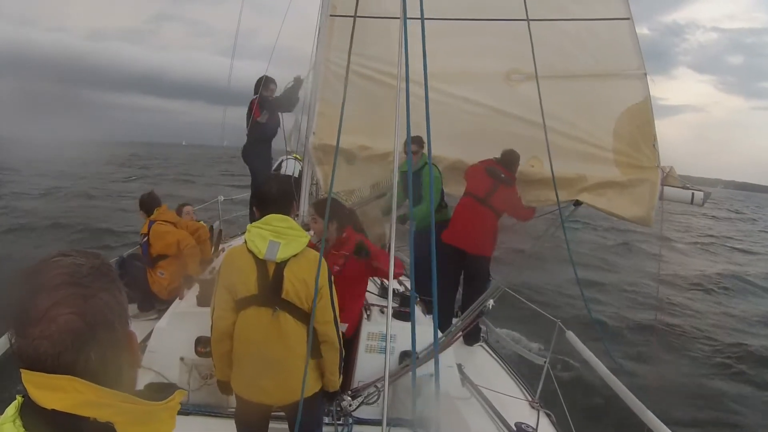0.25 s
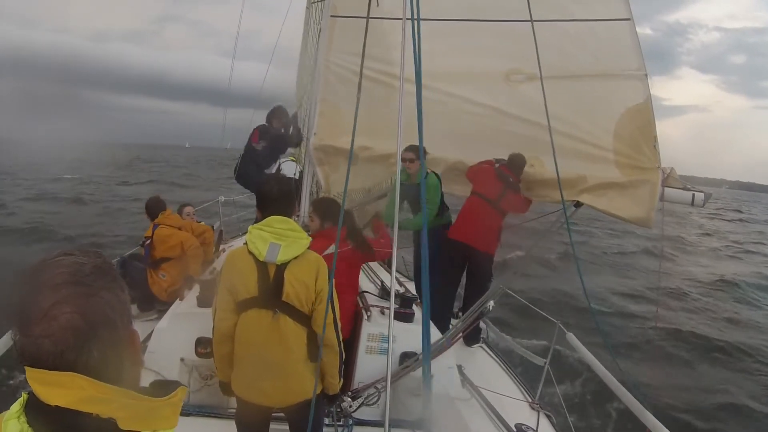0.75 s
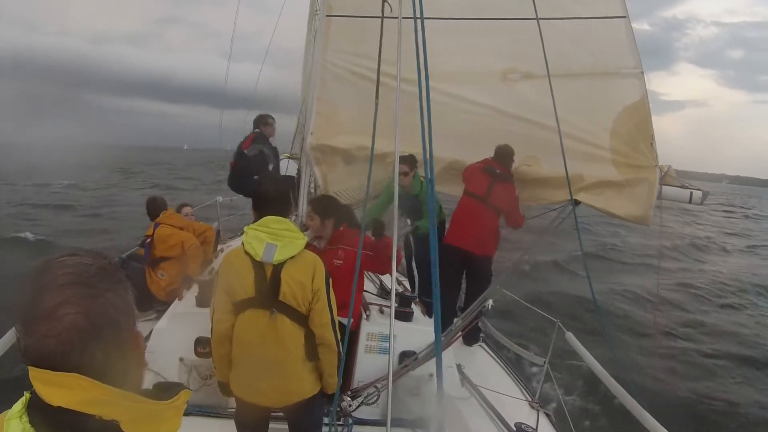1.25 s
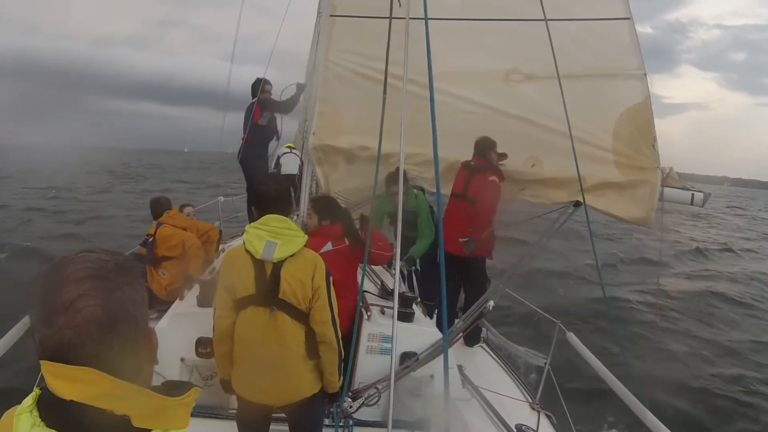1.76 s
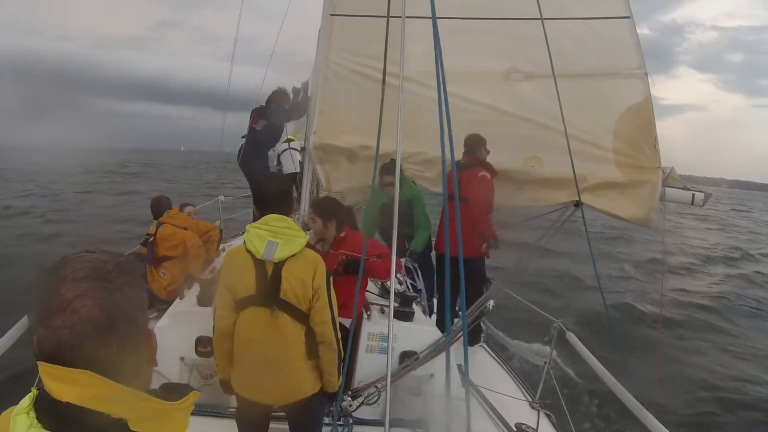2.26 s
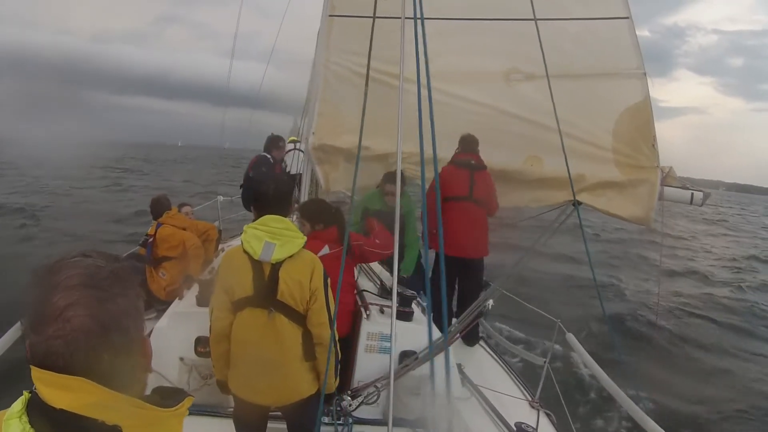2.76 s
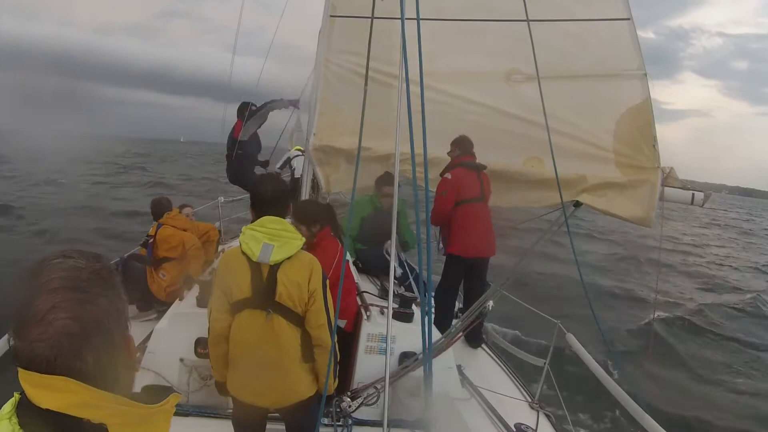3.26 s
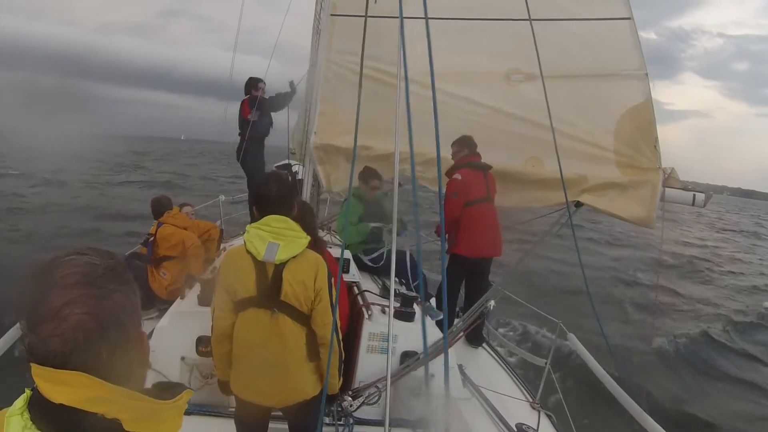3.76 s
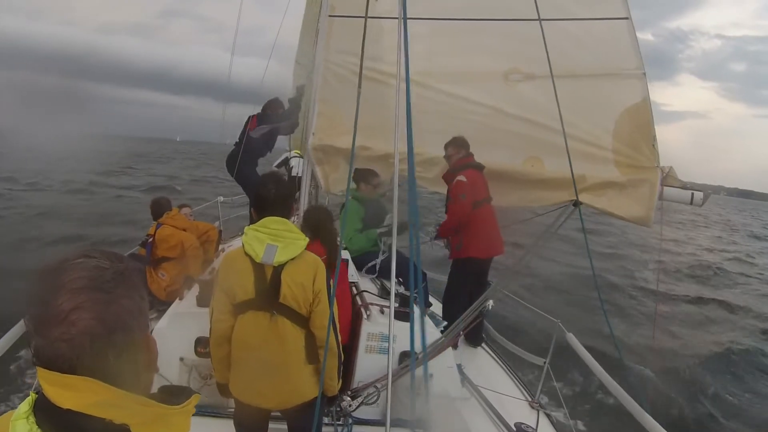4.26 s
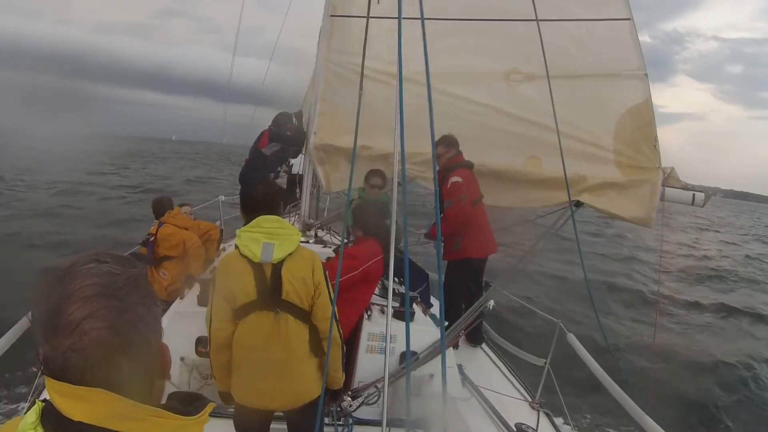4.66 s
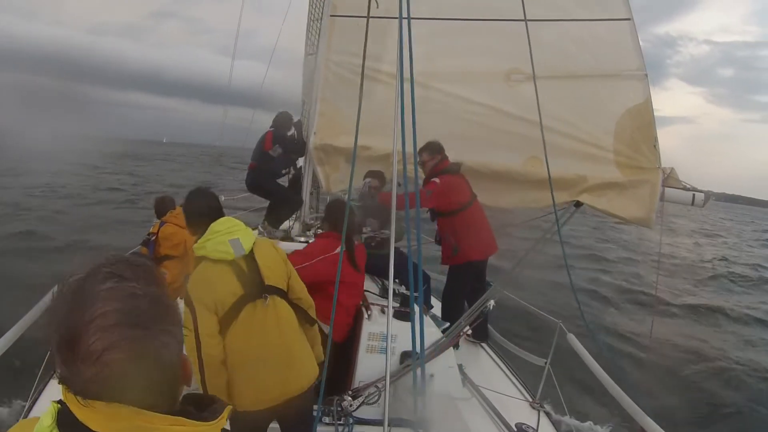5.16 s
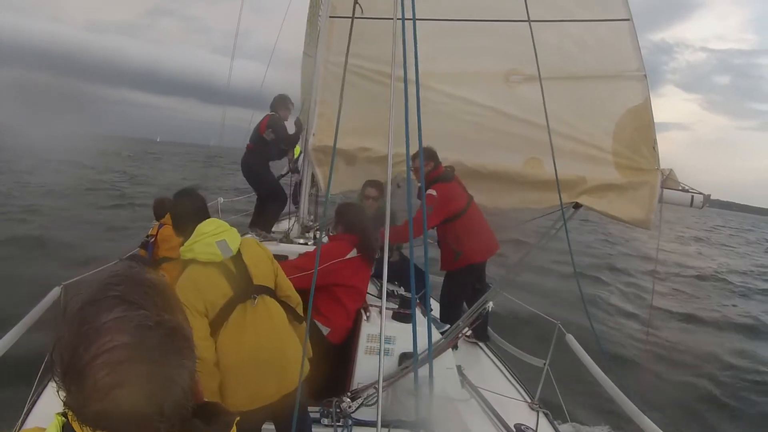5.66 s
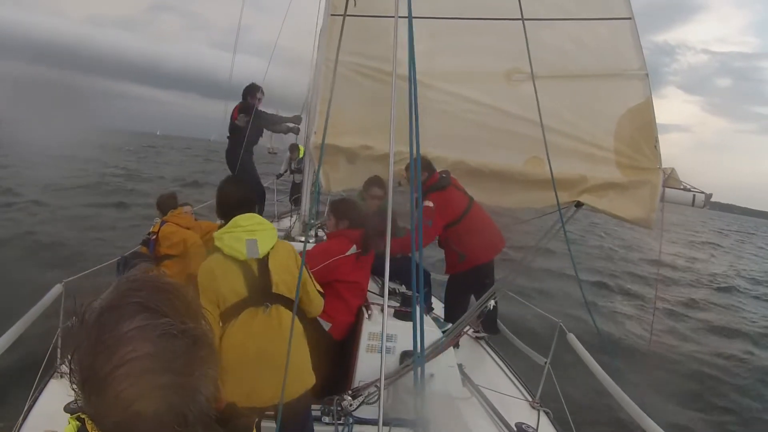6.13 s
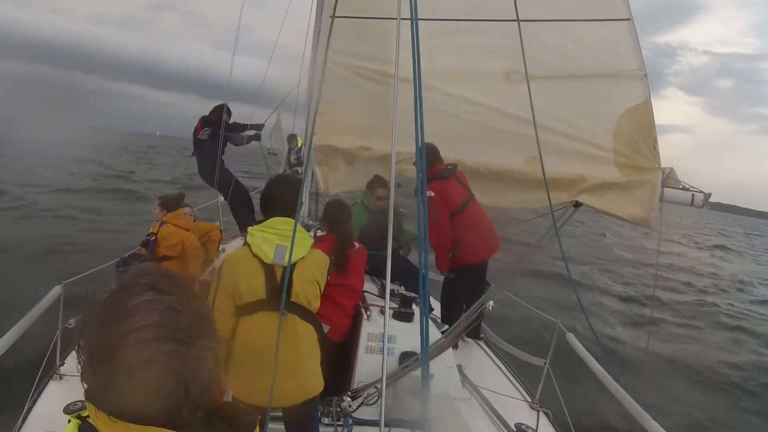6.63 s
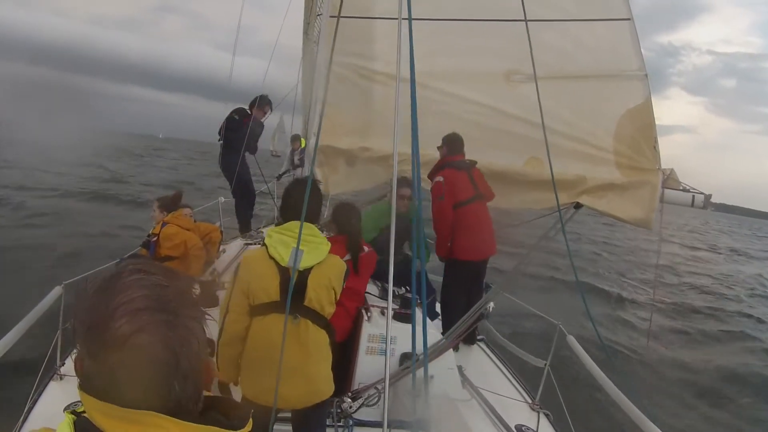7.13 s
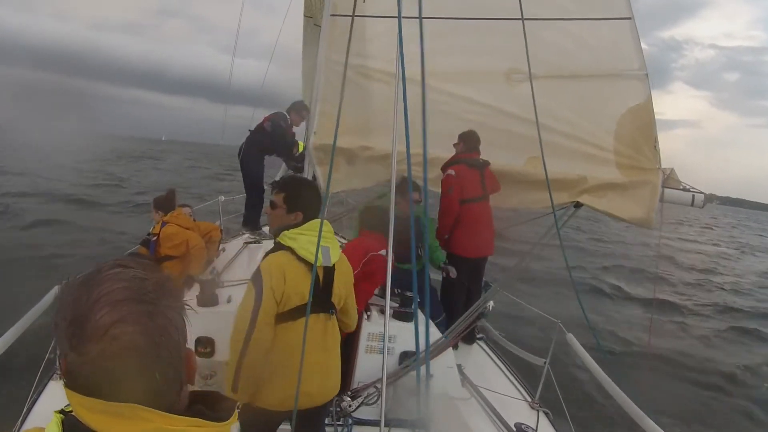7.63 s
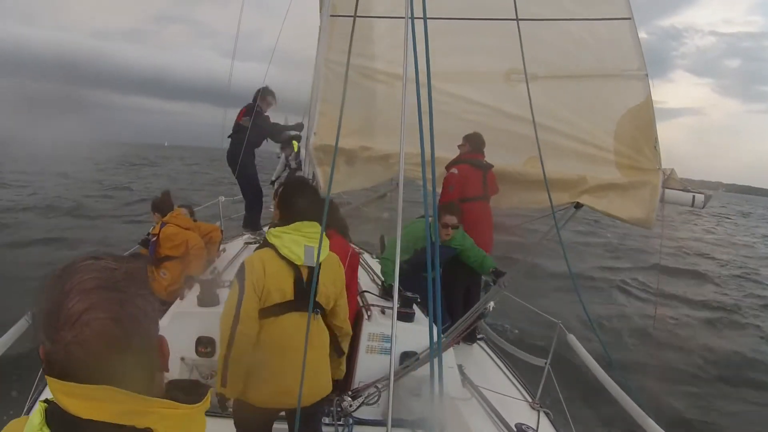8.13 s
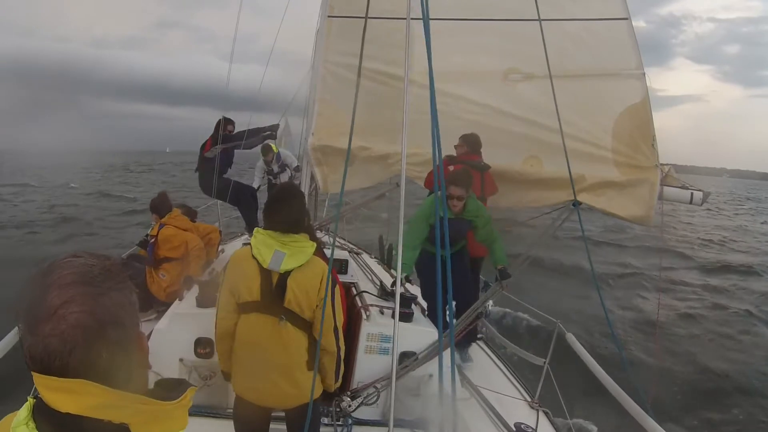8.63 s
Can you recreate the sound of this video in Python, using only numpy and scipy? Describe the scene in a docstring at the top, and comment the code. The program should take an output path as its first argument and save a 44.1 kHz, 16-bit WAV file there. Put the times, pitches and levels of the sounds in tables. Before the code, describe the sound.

Close up on a sailing yacht, a winch is cranked in six quick, overlapping strokes, its pawls chattering brightly over a growling deck. Low gusts thump the rail-mounted microphone, and a heavy knock lands among them. After three seconds the winch stops with a flurry of clacks and a creak; rope rubs, swishes, knocks and squeaky creaks follow over lapping water, with a brief, faint winch turn late on.

```python
"""Winch on a yacht's stern

Close on the winch: spun stroke by stroke, its pawls chatter into the ringing drum and its bearings growl in the deck.
Gusts buffet the microphone and boom in its mount; deck gear knocks the rail that carries it and loaded lines creak.
Nearby, rope and cloth rub and swish, loose rigging taps and waves thud on the hull; water laps and hisses further off.
Blows of noise ring resonances, shaped noise makes wind, rope and sea, and unsteady sines with rasp make creaks.
"""
import sys
import numpy as np
from scipy import signal
from scipy.fft import rfft, irfft
from scipy.io import wavfile
from scipy.ndimage import uniform_filter1d, map_coordinates

SR = 44100
rng = np.random.default_rng(int(sys.argv[2]) if len(sys.argv) > 2 else 0)


def inscribe(sig):
    """Save sig as 16-bit PCM at rate SR to the path in sys.argv[1].

    A 1-D sig is mono; a 2-D sig holds one channel per row.
    Samples are clipped to [-1, 1] before scaling.
    """
    pcm = np.round(np.clip(np.atleast_2d(sig).T, -1, 1) * 32767)
    wavfile.write(sys.argv[1], SR, pcm.astype(np.int16))


N = 392049
TIME = np.arange(N) / SR  # seconds

# winch strokes: start_s, end_s, chatter_db (pawls), growl_db (bearings)
WINCH_STROKES = [(-.04, 0.498, -36, -35.5), (0.476, 0.978, -33.5, -33), (0.852, 1.382, -36, -35),
                 (1.344, 1.882, -38, -35.5), (1.878, 2.409, -41.5, -40), (2.351, 2.879, -38.5, -36.5),
                 (4.14, 4.774, -49.5, -44), (7.168, 7.477, -45, -39.5)]
# single pawl clacks, during, between and just after strokes: start_s, peak_db (before the common trim)
SINGLE_PAWLS = [(1.375, -33.5), (1.798, -31), (1.88, -35.5), (2.887, -36.5), (2.916, -44), (2.927, -36),
                (2.9468, -32.5), (2.958, -32.5), (2.972, -34), (2.9875, -33), (3.4376, -45), (4.152, -44),
                (4.1974, -55), (7.4037, -51), (7.4784, -36.5)]
# resonances of the winch drum: pitch_hz, half_width_hz, level_db (relative)
DRUM_MODES = [(2651, 20, -5), (3410, 240, -27), (4164, 103, -10), (4300, 44, -1), (4910, 280, -17),
              (5530, 28.3, -5), (5715, 96, -18), (6780, 32, -20.5), (6870, 22, -22.5), (8320, 140, -33),
              (10400, 380, -39.5), (12150, 130, -39.5)]
# resonances of the deck under the winch: pitch_hz, half_width_hz, level_db (relative)
DECK_MODES = [(292, 55, -4.5), (713, 72, -7.5), (972, 28.5, 2.5), (1158, 127, -8.5), (1393, 257, -13.5),
              (2045, 23, -14.5), (2365, 136, -17.5), (2726, 140, -16.5), (2920, 54, -15.5)]
# spectrum of a pawl's bare snap: frequency_hz, level_db (relative)
SNAP_SPECTRUM = [(300, -45), (3000, -76.5), (6300, -37), (7400, -36), (9300, -42.5), (14500, -55)]

# gusts striking the microphone: start_s, hold_s, boom_db, shudder_db (before the wind trims)
WIND_GUSTS = [(0.316, 0.089, -31, -61), (0.779, 0.011, -16.5, -33.5), (0.866, 0.0095, -12.5, -28),
              (0.971, 0.021, -12.5, -32.5), (1.16, 0.046, -17.5, -33), (1.286, 0.06, -24, -52),
              (1.576, 0.13, -21.5, -30), (1.814, 0.047, -11, -29), (2.02, 0.019, -25.5, -59),
              (2.274, 0.12, -25, -52), (2.384, 0.28, -30, -31.5), (2.602, 0.23, -23, -44),
              (3.77, 0.25, -32.5, -53.5), (4.424, 0.12, -16, -30.5), (4.742, 0.038, -26.5, -31.5),
              (4.826, 0.06, -17, -52), (4.981, 0.061, -21.5, -42), (5.826, 0.11, -42, -44),
              (5.968, 0.042, -23, -57), (6.278, 0.19, -31.5, -46), (6.522, 0.17, -26.5, -44.5),
              (6.916, 0.047, -35, -76), (7.17, 0.27, -33, -45.5), (7.657, 0.47, -36, -78),
              (8.442, 0.089, -29.5, -46.5), (8.683, 0.1, -38.5, -51)]
GUST_ATTACK_S, GUST_RELEASE_S, PUFF_RELEASE_S = 0.032, 0.076, 0.022
# steady breeze between the gusts: time_s, boom_db, shudder_db (before the wind trims)
BREEZE_LEVELS = [(0, -40.5, -52), (.65, -37.5, -43.5), (1.1, -28.5, -36), (3.2, -33, -38), (3.62, -39, -53),
                 (4.3, -35, -53), (5.3, -38, -57), (5.55, -43, -57.5), (5.702, -35.5, -49),
                 (7.1, -38.5, -58), (8.3, -45, -91), (8.89, -42, -70)]
# spectrum of the boom in the mount: frequency_hz, level_db (relative)
BOOM_SPECTRUM = [(20, -37.5), (42, -11), (66, -30.5), (84, 11.5), (98, -1.5), (125, -5.5), (150, -14),
                 (190, -83)]
# spectrum of the mount's shudder: frequency_hz, level_db (relative)
SHUDDER_SPECTRUM = [(170, -25), (260, -6.5), (294, 2.5), (318, -11.5), (341, 0.5), (385, -19.5),
                    (450, -15.5), (540, -35), (680, -16.5), (830, -35.5), (1000, -21), (1400, -24),
                    (1900, -37)]

# knocks of deck gear: start_s, boom_db, body_db, clack_db (peaks), scrape_s (decay)
GEAR_KNOCKS = [(1.156, -30, -21, -35, 0.012), (1.696, -37, -20, -31, 0.004), (1.776, -5, -14, -21.5, 0.019),
               (1.923, -42, -18, -41, 0.011), (2.856, -46, -33, -32, 0.00077),
               (3.097, -48, -43, -40, 0.0027), (3.368, -42, -29.5, -43, 0.0086),
               (4.44, -19.5, -27, -25.5, 0.018), (4.503, -27, -37, -39, 0.0017),
               (4.602, -41, -40, -33.5, 0.0026), (5.561, -66, -64, -42.5, 0.0013),
               (6.168, -60, -40.5, -37.5, 0.0017), (7.285, -44, -35, -30.5, 0.02),
               (7.785, -28.5, -30, -27, 0.0078), (7.854, -30.5, -43, -35, 0.01),
               (7.901, -41, -34.5, -66, 0.0044), (8.123, -32, -48, -44, 0.0027)]
# resonances of the rail that carries the microphone: pitch_hz, t60_s, level_db (relative)
RAIL_MODES = [(97, 0.22, -2), (121.6, 0.053, 10.5), (293.5, 0.1, 15), (339.6, 0.18, 1), (414, 0.11, 1.5),
              (757, 0.039, -10), (1025, 0.07, 11.5), (1190, 0.051, 15), (1325, 0.082, 11.5),
              (1455, 0.042, -2.5), (1980, 0.033, -2), (2940, 0.039, -3), (3600, 0.052, -6.5)]
# spectrum of a knock's dry crack, also used for the taps: frequency_hz, level_db (relative)
CRACK_SPECTRUM = [(200, -5), (500, -5), (800, -2), (1050, 17), (1520, 13), (1850, -7), (2100, 2),
                  (2900, -18.5), (3900, -21), (4500, -39)]

# lines slipping under load, and one short metallic clink (2.851 s): start_s, length_s, pitch_hz (centre),
# level_db
LINE_CREAKS = [(2.298, 0.055, 627, -45.5), (2.851, 0.043, 1395, -46), (2.972, 0.11, 334, -26),
               (3.065, 0.11, 333.8, -29.5), (3.155, 0.042, 314, -36), (3.198, 0.078, 291.7, -29),
               (3.259, 0.1, 292, -43.5), (4.26, 0.032, 674, -43.5), (4.44, 0.072, 292.7, -19.5),
               (4.461, 0.12, 1010, -36), (4.637, 0.066, 1077, -43.5), (4.691, 0.067, 1037, -40.5),
               (4.758, 0.04, 1025, -40.5), (4.833, 0.059, 987, -33), (6.468, 0.045, 992, -36),
               (6.488, 0.037, 1193, -33.5), (6.513, 0.069, 966, -38.5), (6.495, 0.035, 1730, -48.5),
               (6.591, 0.094, 995, -33.5), (6.696, 0.05, 663, -36.5), (6.705, 0.05, 1390, -48),
               (6.74, 0.036, 1960, -52.5), (6.741, 0.1, 696, -46), (8.469, 0.084, 297, -42),
               (8.602, 0.08, 904, -57), (8.68, 0.053, 318, -44.5)]

# pulls of rope over the deck, with cloth rubbing: start_s, length_s, level_db (before the rub trim)
ROPE_PULLS = [(2.776, 1.08, -54), (3.87, 0.4, -48), (4.194, 1.1, -57.5), (4.685, 0.56, -58.5),
              (5.215, 1.4, -57.5), (6.265, 0.97, -52)]
PULL_SWELL = 0.75  # power of the sine arch of a pull
# spectrum of rope and cloth rubbing: frequency_hz, level_db (relative)
RUB_SPECTRUM = [(400, -1), (700, 9.5), (1200, 7), (1850, 4.5), (2600, 8.5), (3600, -6.5), (5200, 0.5),
                (14500, -37)]
# quick swishes and ticks of rope and cloth: start_s, level_db, decay_s
ROPE_SWISHES = [(3.22, -51.5, 0.027), (3.362, -69, .012), (3.957, -62, .07), (4.034, -50, 0.007),
                (4.783, -42.5, 0.034), (5.049, -43, 0.0075), (5.068, -44.5, 0.0062), (5.135, -54, 0.14),
                (6.336, -52, 0.035), (6.442, -52.5, 0.04), (6.81, -51, 0.11)]
# spectrum of the swishes: frequency_hz, level_db (relative)
SWISH_SPECTRUM = [(1500, -11), (2600, 14), (3600, 4), (5200, 12), (10000, -13), (13500, -8), (15000, -27)]
# rope and rigging tapping: TAP_DB is the faintest, TAP_SPREAD_DB the range above it
TAPS_PER_S, TAP_DB, TAP_SPREAD_DB, TAP_DECAY_S = 3, -63.5, 10.5, 0.0063

# waves thudding on the hull: start_s, level_db (before the swing's rise and decay)
HULL_THUDS = [(7.872, -28), (8.081, -21)]
# spectrum of the sea with the low rumble of steady wind: frequency_hz, level_db (relative, per Hz)
SEA_SPECTRUM = [(20, 23), (41, 22), (60, 20.5), (190, 7.5), (300, 11), (540, -11.5), (690, 4), (830, -6.5),
                (1000, 2.5), (1850, -8), (2600, -4.5), (3600, -14.5), (5100, -10.5), (7000, -21),
                (14000, -26.5)]
EDGE_HZ = 14700  # upper edge of the recorder's band


def amp(db):
    """Decibels to gain."""
    return 10 ** (np.asarray(db) / 20)


def unit(x):
    """Scales to an rms of one."""
    return x / np.sqrt(np.mean(x ** 2) + 1e-20)


def shape(points, hz):
    """Gain of a spectrum, joined on a log-frequency axis; above its last point it falls away steeply."""
    f, db = np.transpose(points)
    return amp(np.interp(np.log(hz + 1), np.log(f), db)) / np.maximum(hz / f[-1], 1) ** 4


def noise(points):
    """Noise with the given spectrum, at an rms of one."""
    spectrum = rfft(rng.standard_normal(N))
    return unit(irfft(spectrum * shape(points, np.fft.rfftfreq(N, 1 / SR)), N))


def wander(hz):
    """Slow chance, up to about hz changes a second, at an rms of one."""
    spectrum = rfft(rng.standard_normal(N))
    return unit(irfft(spectrum / (1 + (np.fft.rfftfreq(N, 1 / SR) / hz) ** 4), N))


def steadied(x, seconds):
    """Takes the slow swells out of a noise and keeps its quick flutter."""
    size = max(int(seconds * SR), 8)
    power = uniform_filter1d(uniform_filter1d(x ** 2, size), size)
    return x / np.sqrt(power + 1e-4)


def add(mix, s, sound):
    """Mixes a sound in at time s, in seconds."""
    part = mix[max(round(s * SR), 0):][:len(sound)]
    part += sound[:len(part)]


def ring(modes, snap_db, size=8192):
    """The causal (minimum-phase) ring of a set of resonances and the bare snap after one click."""
    hz = abs(np.fft.fftfreq(size, 1 / SR))
    power = (amp(snap_db) * shape(SNAP_SPECTRUM, hz)) ** 2
    for f, width, db in modes:
        power = power + (amp(db) / (1 + ((hz - f) / width) ** 2)) ** 2
    log_gain = np.log(power) / 2
    return np.fft.ifft(np.exp(np.conj(signal.hilbert(log_gain)))).real[:size // 2]


def winch(teeth_per_s=75, bounce_s=0.024, uneven_db=3, swell=1.9, coast=0.23):
    """Each stroke speeds the drum up and lets it coast; pawls drop faster with it and bounce, bearings rattle."""
    start, end, chatter_db, growl_db = np.transpose(WINCH_STROKES)[:, :, None]
    arch = np.sin(np.pi * np.clip((TIME - start) / (end - start), 0, 1)).clip(0)
    force = (1 - coast) * arch ** swell + coast * np.tanh(20 * arch)
    speed = np.sqrt(arch.max(0)) * amp(3 * wander(60))
    teeth = np.cumsum(teeth_per_s * speed) / SR
    drops = np.diff(np.floor(teeth), prepend=0) * amp(uneven_db * rng.standard_normal(N))
    # every drop ends in a burst of tiny bounces
    contact = unit(signal.lfilter([1], [1, -np.exp(-1 / (bounce_s * SR))], drops))
    spots = drum_spots()
    chatter = struck_metal(contact, teeth, spots, waver_s=0.00003)
    growl = struck_metal(contact, teeth, [ring(DECK_MODES, snap_db=0.0)], waver_s=0.000398)
    chatter_level = np.linalg.norm(amp(chatter_db) * force, axis=0)  # overlapping strokes add in power
    growl_level = np.linalg.norm(amp(growl_db) * force, axis=0)
    return chatter_level * chatter + growl_level * growl + single_pawls(spots)


def struck_metal(contact, teeth, rings, waver_s):
    """Noisy blows ring the body, each drop on a spot drawn at random; the ring wavers slightly in pitch."""
    blows = contact * rng.standard_normal(N)
    struck = rng.integers(0, len(rings), N)[teeth.astype(int)]
    sound = sum(signal.oaconvolve(blows * (struck == k), body)[:N] for k, body in enumerate(rings))
    read_at = (TIME + waver_s * wander(9.4)) * SR
    sound = map_coordinates(sound, [read_at], mode="reflect")
    return steadied(unit(sound), 0.056)


def single_pawls(spots, pawl_db=-1, settle_s=0.0019):
    """A single pawl slides off its tooth and settles in bounces, ringing one spot of the drum."""
    out, t = np.zeros(N), TIME[:SR // 20] / settle_s
    for s, db in SINGLE_PAWLS:
        bounces = rng.standard_normal(len(t)) * t * np.exp(-t)
        drop = signal.fftconvolve(bounces, spots[rng.integers(len(spots))])
        add(out, s, amp(db + pawl_db) * drop / abs(drop).max())
    return out


def drum_spots(colour_db=1.5, detune_hz=18, snap_db=-5.5, count=5):
    """The drum's ring at several spots around it: each shifts the strength and pitch of the modes a little."""
    steps = np.tile(np.linspace(-1, 1, count), (2, len(DRUM_MODES), 1))
    db, hz = rng.permuted(steps, axis=2)
    same_width = np.zeros(len(DRUM_MODES))
    spots = []
    for k in range(count):
        shift = np.transpose([detune_hz * hz[:, k], same_width, colour_db * db[:, k]])
        spots.append(ring(np.array(DRUM_MODES) + shift, snap_db))
    return spots


def wind(buffet_db=-0.5, shudder_db=-1, flutter_db=3.5):
    """Gusts ride on the breeze; their eddies boom in the microphone's mount and make it shudder."""
    times, *levels = np.transpose(BREEZE_LEVELS)
    power = np.array([amp(np.interp(TIME, times, db)) ** 2 for db in levels])
    for start, hold, *db in WIND_GUSTS:
        power += (amp(db)[:, None] * gust(start, hold)) ** 2
    push, shake = np.sqrt(power)
    boom = steadied(noise(BOOM_SPECTRUM), 0.045)
    shudder = unit(steadied(noise(SHUDDER_SPECTRUM), 0.034) * amp(flutter_db * wander(18)))
    return amp(buffet_db) * push * boom + amp(shudder_db) * shake * shudder


def gust(start, hold):
    """A gust builds quickly, holds and dies away, the sooner the shorter it is."""
    t = TIME - start
    release = min(PUFF_RELEASE_S + hold / 2, GUST_RELEASE_S)
    return np.clip(t / GUST_ATTACK_S, 0, 1) * np.exp(-np.maximum(t - GUST_ATTACK_S - hold, 0) / release)


def knocks(scrape=0.11, crack_db=-7, crack_s=0.008):
    """Each blow cracks and, with a short scrape after it, rings the low, middle and high modes of the rail."""
    out, t = np.zeros(N), np.arange(SR // 2) / SR
    register = np.digitize([mode[0] for mode in RAIL_MODES], [190, 560])  # Hz between low, middle and high
    rings = []
    for hz, t60, db in RAIL_MODES:
        # a mode swells over about its first cycle, so the low ones start softly
        onset = 1 - np.exp(-(2 * hz * t) ** 2)
        rings.append(amp(db - 60 * t / t60) * np.sin(2 * np.pi * hz * t) * onset)
    rings = np.array(rings)
    crack = noise(CRACK_SPECTRUM)
    for s, boom_db, body_db, clack_db, scrape_s in GEAR_KNOCKS:
        blow = scrape * rng.standard_normal(len(t)) * np.exp(-t / scrape_s)
        blow[0] += 1
        for k, db in enumerate((boom_db, body_db, clack_db)):
            sound = signal.fftconvolve(blow, rings[register == k].sum(0))[:len(t)]
            add(out, s, amp(db) * sound / abs(sound).max())
        add(out, s, amp(clack_db + crack_db) * crack[int(s * SR):][:len(t)] * np.exp(-t / crack_s))
    return out


def creaks(jitter=0.025, sag=0.015, bend=0.07, rough_db=3.0, second_db=-26, third_db=-33, early=0.69,
           rasp_db=-15, rasp_at_hz=1000, rasp_top_hz=1600, tail_db=-15, tail_s=0.17):
    """A slipping line gives short, unsteady tones that swell, bend with the load, rasp on the deck and linger."""
    out, waver, grip = np.zeros(N), wander(100), wander(65)
    rasp = signal.oaconvolve(rng.standard_normal(N), ring(DECK_MODES, snap_db=-23))[:N]
    rasp = amp(rasp_db) * unit(rasp)
    rasp = signal.sosfilt(signal.butter(2, rasp_top_hz, fs=SR, output="sos"), rasp)
    for s, length, hz, db in LINE_CREAKS:
        count = int(length * SR)
        at = slice(int(s * SR), int(s * SR) + count)
        load = np.sin(np.pi * np.linspace(0, 1, count) ** early)  # peaks before the middle
        rise = bend * (load - np.average(load, weights=load ** 2))
        pitch = hz * (1 + rise + np.linspace(sag, -sag, count) + jitter * waver[at])
        turn = 2 * np.pi * np.cumsum(pitch) / SR
        tone = np.sin(turn) + amp(second_db) * np.sin(2 * turn) + amp(third_db) * np.sin(3 * turn)
        tone += rasp[at] * np.sqrt(hz / rasp_at_hz)  # higher creaks rasp more
        add(out, s, amp(db) * unit(load * tone * amp(rough_db * grip[at])))
    tail = rng.standard_normal(SR // 4) * np.exp(-TIME[:SR // 4] / tail_s)
    return out + amp(tail_db) * signal.oaconvolve(out, tail / np.linalg.norm(tail))[:N]


def ropes(grain_db=3, rub_db=-1):
    """Each pull of a rope swells and fades with a grainy rub; quick swishes of noise start sharply and decay."""
    speed = np.zeros(N)
    for s, length, db in ROPE_PULLS:
        arch = np.sin(np.pi * np.clip((TIME - s) / length, 0, 1)).clip(0)
        speed += amp(db) * arch ** PULL_SWELL
    out = amp(rub_db) * speed * unit(noise(RUB_SPECTRUM) * amp(grain_db * wander(130)))
    hiss = unit(noise(SWISH_SPECTRUM) * amp(1.0 * wander(300)))
    t = np.arange(SR // 3) / SR
    for s, db, decay in ROPE_SWISHES:
        add(out, s, amp(db) * hiss[int(s * SR):][:len(t)] * np.exp(-t / decay))
    return out


def taps():
    """Faint, dull scuffs of loose rigging: brief bursts of noise at random moments."""
    out, t = np.zeros(N), TIME[:SR // 10] / TAP_DECAY_S
    for when, size in rng.random((int(TAPS_PER_S * N / SR), 2)):
        add(out, when * N / SR, amp(TAP_DB + TAP_SPREAD_DB * size) * t * np.exp(1 - t))
    return out * noise(CRACK_SPECTRUM)


def hull(hull_hz=40, decay_s=0.097, rise_s=0.0047):
    """A wave sets the hull swinging for a few deep cycles."""
    out, t = np.zeros(N), np.arange(SR // 2) / SR
    swing = np.sin(2 * np.pi * hull_hz * t) * np.exp(-t / decay_s) * (1 - np.exp(-t / rise_s))
    for s, db in HULL_THUDS:
        add(out, s, amp(db) * swing)
    return out


def sea(sea_db=-46, lap_db=4.0, lap_top_hz=1800):
    """Water laps along the hull, its lower part swelling; the hiss of the waves further off stays even."""
    wash = noise(SEA_SPECTRUM)
    near = signal.sosfilt(signal.butter(1, lap_top_hz, fs=SR, output="sos"), wash)
    lap = amp(lap_db * np.tanh(wander(7.0)))
    return amp(sea_db) * (wash + near * (lap - 1))


def scene():
    """Everything at one microphone on the rail."""
    return (winch() + wind() + knocks() + creaks() + ropes() + taps() + hull() + sea())[None]


def record(dry):
    """The recorder's band limit: a steep low-pass."""
    low_pass = signal.firwin(255, EDGE_HZ, window=("kaiser", 9), fs=SR)
    return signal.oaconvolve(dry, low_pass[None], "same")


dry = scene()
out = record(dry)
inscribe(out)
```